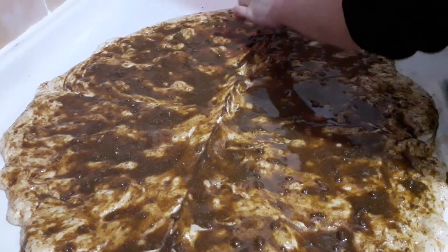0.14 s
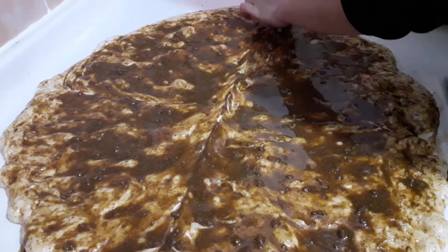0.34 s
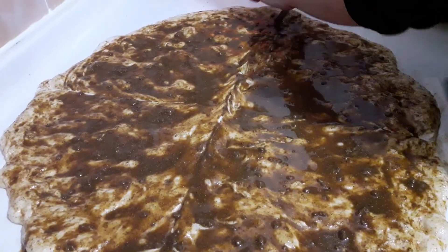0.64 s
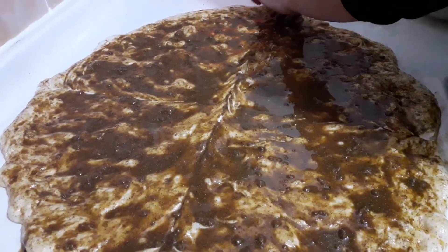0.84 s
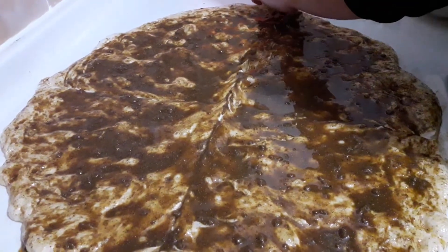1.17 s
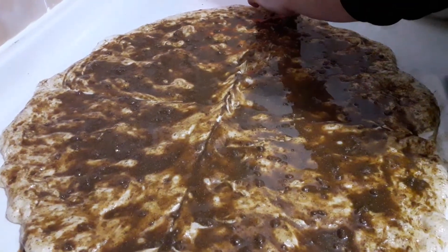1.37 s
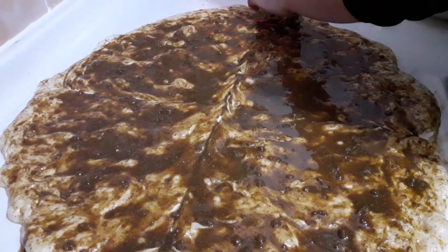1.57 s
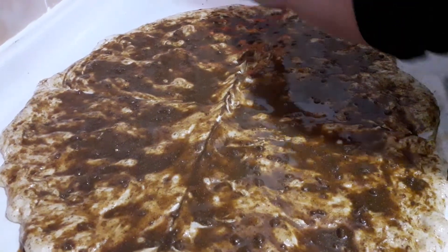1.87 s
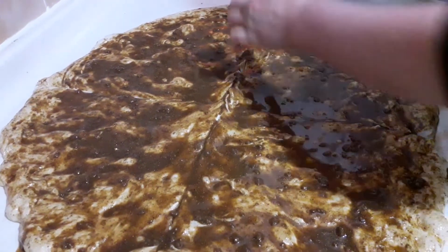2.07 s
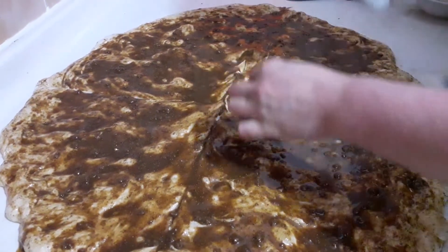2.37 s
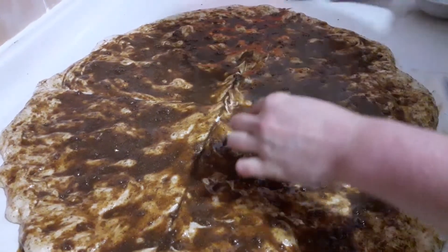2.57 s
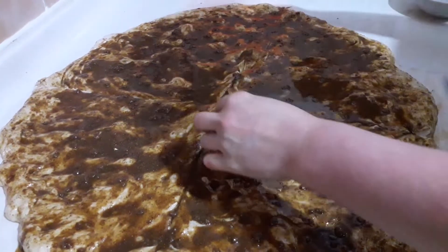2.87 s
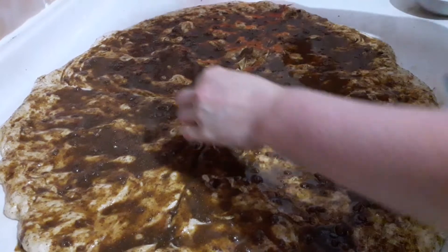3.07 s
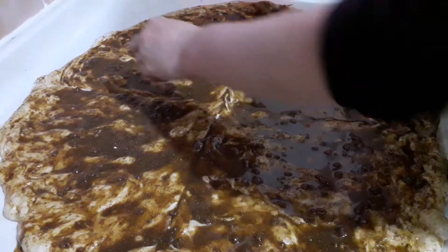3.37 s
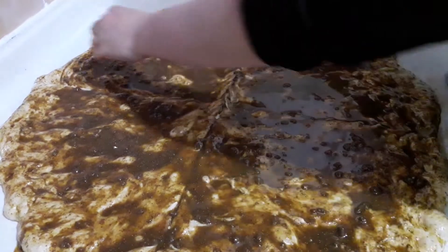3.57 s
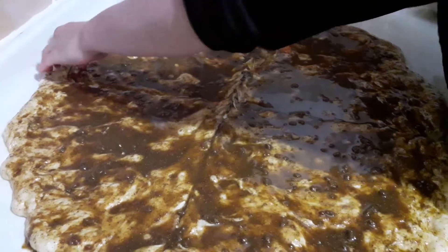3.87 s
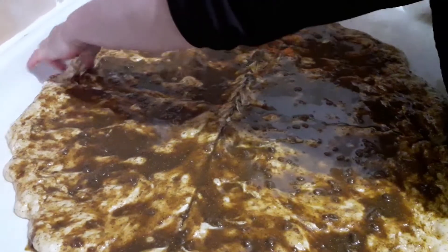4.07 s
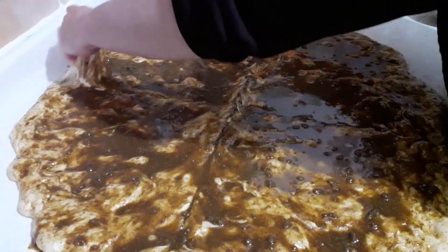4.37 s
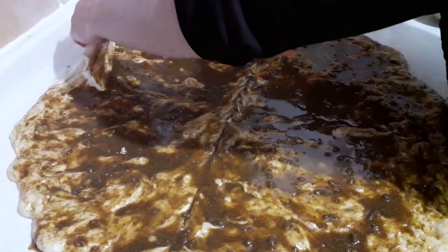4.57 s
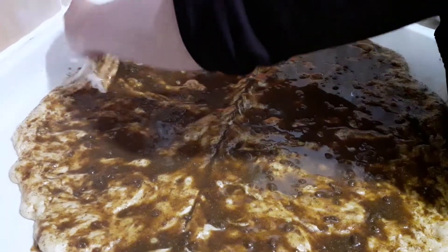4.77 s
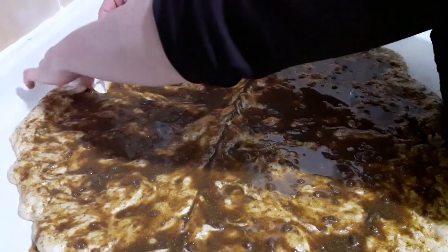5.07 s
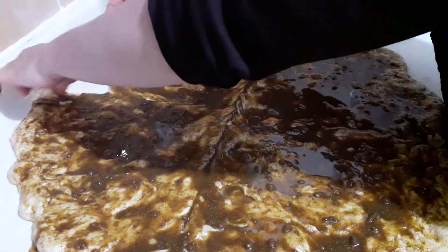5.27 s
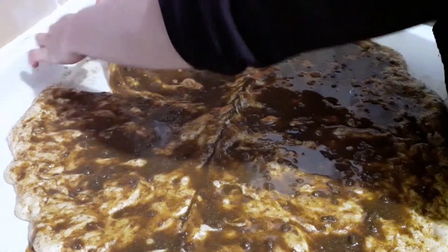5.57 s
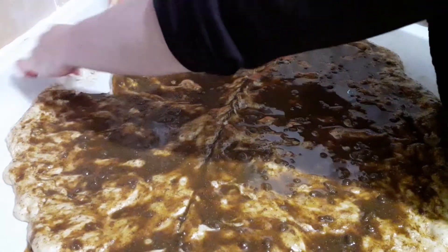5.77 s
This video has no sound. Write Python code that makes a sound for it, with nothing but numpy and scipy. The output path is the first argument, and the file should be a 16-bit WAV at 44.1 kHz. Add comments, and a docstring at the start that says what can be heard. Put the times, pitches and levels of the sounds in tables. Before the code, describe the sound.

A fridge hums low and steady in a quiet kitchen. A little way off, something hollow is pushed about in short, faint scraping strokes, then set down with a clack and a few ringing knocks. Nearer the microphone, a hand bumps the worktop, a sleeve rustles and fingers squish into oily dough. The dough is peeled up with tiny wet clicks, fine crackle and a few more soft thumps.

```python
"""A fridge hums throughout while hands work a sheet of oily dough on a kitchen worktop.
First, a little way off, something hollow is pushed about in short strokes, friction exciting its body.
After two seconds it is set down with a clack and a few knocks that also set the worktop ringing.
Then, nearer by, a hand bumps the worktop, a sleeve rustles and fingers sink into the dough.
From four seconds on the dough is peeled up amid more bumps, its oil films snapping in small wet clicks."""
import sys
import numpy as np
from scipy import signal
from scipy.fft import rfft, irfft, next_fast_len
from scipy.io import wavfile
from scipy.ndimage import uniform_filter1d

SR = 44100
rng = np.random.default_rng(int(sys.argv[2]) if len(sys.argv) > 2 else 0)


def file_out(sig):
    """Save sig as 16-bit WAV at sys.argv[1]."""
    # one column per channel
    cols = np.atleast_2d(sig).T
    # limit, then scale
    lim = np.clip(cols, -1, 1)
    pcm = np.round(lim * 32767).astype(np.int16)
    wavfile.write(sys.argv[1], SR, pcm)


N = 261954
TIME = np.arange(N) / SR
RING = TIME[:SR // 3]  # time axis of one impact or echo
HAND_LAG_S = -0.00037  # sound from the hand reaches the left side first

# spectrum of dough letting go: (f/Hz, level/dB)
PEEL_SPECTRUM = [(1500, -9), (3000, -13.5), (6000, -10.5), (8200, -1), (10000, -3.5), (12500, -5),
                 (14200, -6), (15500, 0)]


def undb(db):
    """Amplitude ratio of a level in decibels."""
    return 10 ** (np.asarray(db) / 20)


def unit(x):
    """Normalisation to rms 1."""
    return x / np.sqrt(np.mean(x ** 2))


def unit_hit(x):
    """Normalisation of a transient: its loudest 10 ms have rms 1."""
    power = np.mean(np.atleast_2d(x) ** 2, axis=0)
    return x / np.sqrt(uniform_filter1d(power, SR // 100).max())


def pan(left_db):
    """Level difference: two channel gains, the left greater by left_db."""
    return undb(np.array([[left_db], [-left_db]]) / 2)


def add(out, s, sound):
    """Superposition of a sound from time s."""
    i = max(int(s * SR), 0)
    out[:, i:i + sound.shape[-1]] += sound[..., :N - i]


def colour(x, points):
    """Minimum-phase filtering to a response given as (f/Hz, level/dB)."""
    n = 2 * next_fast_len(x.shape[-1] // 2 + SR // 20)
    hz, db = np.transpose(points)
    bin_hz = np.arange(n // 2 + 1) * SR / n
    gain = undb(np.interp(np.log(bin_hz + 1), np.log(hz), db))
    cepstrum = irfft(np.log(gain))
    cepstrum[1:n // 2] *= 2  # folding onto positive time makes the filter causal
    cepstrum[n // 2 + 1:] = 0
    return irfft(rfft(x, n) * np.exp(rfft(cepstrum)), n)[..., :x.shape[-1]]


def rolloff(x, order, hz, kind="low"):
    """Maximally flat low-pass or high-pass filtering."""
    return signal.sosfilt(signal.butter(order, hz, kind, fs=SR, output="sos"), x)


def resonance(x, hz, width):
    """Forced response of one damped resonator."""
    return signal.lfilter(*signal.iirpeak(hz, hz / width, fs=SR), x)


def band(x, hz, width):
    """Two equal resonators in cascade, for steep flanks."""
    return resonance(resonance(x, hz, width), hz, width)


def waver(rate):
    """Slow random fluctuation with a spread near 1."""
    knots = rng.standard_normal(int(N / SR * rate) + 2)
    return np.interp(TIME * rate, np.arange(len(knots)), knots)


def swell(s, hold_s, attack_s, release_s):
    """Envelope of a movement: bell-shaped rise until time s, hold, exponential decay."""
    before, after = np.minimum(TIME - s, 0), np.maximum(TIME - s - hold_s, 0)
    return np.exp(-(before / attack_s) ** 2 - after / release_s)


def grains(rate, spread_db):
    """Shot noise: random tiny impulses, a few much stronger than the rest."""
    sizes = undb(spread_db * np.minimum(rng.exponential(size=N), 4))
    return unit((rng.random(N) < rate / SR) * sizes * rng.choice([-1, 1], N))


def burst(decay_s):
    """Exponentially decaying noise of a contact."""
    return rng.standard_normal(len(RING)) * np.exp(-RING / decay_s)


def diffuse(n, split_hz=750):
    """Diffuse field: noise from all sides is coherent between the channels only in the bass."""
    mid, side = rfft(rng.standard_normal((2, n)))
    hz = np.arange(len(mid)) * SR / n
    coherence = .97 / (1 + (hz / split_hz) ** 2)
    return irfft(mid * np.sqrt(1 + coherence) + side * np.sqrt(1 - coherence) * [[1], [-1]], n)


def room(x, wet_db, lag_s=0):
    """Reverberation: direct sound (lag_s later on the left), dense reflections and a weak, dull tail."""
    early_t60_s, late_t60_s, late_db = 0.21, 0.68, -21.5
    early = diffuse(len(RING)) * undb(-60 * RING / early_t60_s)
    late = diffuse(len(RING)) * undb(late_db - 60 * RING / late_t60_s)
    response = unit(early + rolloff(late, order=1, hz=1500)) / np.sqrt(len(RING)) * undb(wet_db)
    lag = round(lag_s * SR)
    response[[0, 1], [max(lag, 0), max(-lag, 0)]] += 1  # the direct path
    heard = signal.fftconvolve(np.atleast_2d(x), response, axes=1)[:, :x.shape[-1]]
    return heard / np.hypot(1, undb(wet_db))


def fridge():
    """Line spectrum over noise: wavering compressor tones, hiss, a thin whine and the room's still air."""
    # spectrum of the room's air: (f/Hz, level/dB)
    air_spectrum = [(25, -26.5), (55, -4), (80, -13.5), (125, -2), (160, 1.5), (210, -22), (290, -21),
                    (430, -16), (700, -24), (1400, -27.5), (3000, -30.5), (6500, -36.5), (10000, -34.5),
                    (16000, -40.5)]
    # compressor tones: (f/Hz, level/dB)
    tones = [(53.8, -73.5), (96.9, -65.5), (145.3, -63.5), (279.9, -72.5), (393.0, -74), (489.9, -82),
             (694.4, -79), (1184, -80)]
    # bands of hiss: (f/Hz, width/Hz, level/dB, left minus right/dB)
    hiss_bands = [(276, 88, -71, -9.5), (8300, 730, -82.5, 12)]
    hum_waver_db = 2.3 * waver(2.8)
    out = unit(colour(diffuse(N), air_spectrum)) * undb(-64 + .5 * waver(4.5))
    for hz, db in tones:
        # the shorter the wave, the more its phase differs between the channels
        phase = 2 * np.pi * hz * TIME + 0.69 * waver(8.8) + np.array([[0], [min(hz / 600, 2)]])
        out += np.sqrt(2) * np.sin(phase) * undb(db + hum_waver_db + 0.54 * waver(6.4)) * pan(0.68)
    flow = diffuse(N)
    for hz, width, db, left_db in hiss_bands:
        out += unit(band(flow, hz, width)) * undb(db + 0.59 * waver(17)) * pan(left_db)
    whine = unit(band(flow, hz=4350, width=200)) * undb(-83.5 + 1.5 * waver(11))
    return out + whine * pan(1.4)


def sliding():
    """Stick-slip friction: dense slips excite the hollow body as each stroke speeds up and dies away."""
    # response of the body to slips: (f/Hz, level/dB)
    slip_spectrum = [(210, -40), (350, -17), (707, 2.5), (850, -7.5), (1020, -14.5), (1240, -5), (1430, -8),
                     (1490, -7.5), (1750, -6.5), (1900, -6), (2210, -5), (2740, -14.5), (4000, -23),
                     (5200, -63), (8800, -120)]
    # pushes: (fastest at t/s, length/s, lower body/dB, upper body/dB, grit/dB, favoured resonance f/Hz)
    strokes = [(0.117, 0.091, -58, -50, -67, 1660), (0.266, 0.092, -53.5, -57.5, -67.5, 1630),
               (.53, 0.1, -53.5, -51.5, -66.5, 1510), (0.894, 0.098, -51, -55, -60.5, 1250),
               (0.963, .07, -63.5, -55.5, -68, 1630), (1.085, 0.1, -62.5, -54, -65, 1510),
               (1.185, 0.029, -83, -51, -64.5, 1760), (1.248, .085, -48.5, -47.5, -54.5, 1540),
               (1.383, 0.088, -53.5, -52.5, -66, 1500), (1.549, .08, -55.5, -53.5, -68.5, 1440)]
    # gritty hiss: (f/Hz, level/dB)
    grit_spectrum = [(1500, -7), (3000, 7), (4200, -2), (8000, 4.5), (11000, -3), (15000, -3)]
    lead_s = 0.0098  # the upper body speaks first, before the full weight bears down
    slips = unit(colour(grains(rate=3100, spread_db=2), slip_spectrum))
    low, high = (unit(rolloff(slips, order=4, hz=1000, kind=kind)) for kind in ("low", "high"))
    grit = unit(colour(grains(rate=1100, spread_db=4.5), grit_spectrum))
    out = np.zeros(N)
    for s, length_s, low_db, high_db, grit_db, ring_hz in strokes:
        push, lead = (swell(at, 0, 0.44 * length_s, 0.35 * length_s) for at in (s, s - lead_s))
        upper = unit(unit(band(high, ring_hz, width=800)) + undb(-3) * high)
        out += push * (low * undb(low_db) + grit * undb(grit_db)) + lead * upper * undb(high_db)
    return room(out, wet_db=5.5, lag_s=-0.0004) * pan(3.7)


def crack(db):
    """A brief contact has a broad spectrum: a bright crack, heard mostly by reflection from the walls."""
    # spectrum of the hard contact: (f/Hz, level/dB)
    crack_spectrum = [(900, -16), (1400, -32), (1750, 3), (2100, -19), (2720, 0.5), (3350, -11),
                      (4500, 1.5), (7000, -4), (8000, 2.5), (9500, -8.5), (12500, -8.5), (15500, -10.5)]
    contact = colour(burst(decay_s=0.0018), crack_spectrum)
    return unit_hit(room(contact, wet_db=12.5)) * undb(db) * pan(3.7)


def ticks():
    """Lone hard ticks: impulsive cracks with their highest treble attenuated."""
    # ticks: (t/s, level/dB)
    contacts = [(.539, -54), (5.668, -63)]
    out = np.zeros((2, N))
    for s, db in contacts:
        add(out, s, rolloff(crack(db), order=2, hz=9000))
    return out


def thump(db, ring_hz, pat_db, lag_s):
    """Modal excitation: a blow rings the worktop modes that its place favours, under a dull pat."""
    # worktop modes: (f/Hz, T60/s, level/dB)
    modes = [(77.9, 0.63, -1.5), (103.6, 0.51, 0), (131, 0.36, -0.5), (150.5, 0.51, -0.5), (167, 0.18, 2.5),
             (242.2, 0.36, -7), (278, 0.43, -7), (380, 0.057, -6), (425, 0.089, -9)]
    # spectrum of the soft contact: (f/Hz, level/dB)
    pat_spectrum = [(30, -39), (80, -10), (200, 4.5), (350, 7), (450, -3), (740, -0.5), (1050, -14.5),
                    (1350, -10), (1700, -23.5), (2100, -18.5), (5000, -32.5), (12000, -40)]
    ring = 0
    for hz, t60, mode_db in modes:
        place_db = -8 * abs(np.log2(hz / ring_hz))
        phase = 2 * np.pi * hz * RING + 2.01 * rng.standard_normal()
        ring += undb(mode_db + place_db - 60 * RING / t60) * np.sin(phase)
    ring *= 1 - np.exp(-RING / 0.0024)  # the top is loaded gradually
    ring = rolloff(ring, order=3, hz=64.3, kind="high")  # it radiates little deep bass
    pat = room(colour(burst(decay_s=0.0066), pat_spectrum), wet_db=18, lag_s=lag_s)
    ring = room(ring, wet_db=-18, lag_s=lag_s)
    return unit_hit(ring) * undb(db) * pan(0.83) + unit_hit(pat) * undb(pat_db) * pan(1.2)


def knocks():
    """Free vibration of the hollow thing set down: a softer contact leaves its upper modes quiet."""
    # modes of the hollow body: (f/Hz, width/Hz, level/dB)
    modes = [(353, 25, -12), (480, 26, -6.5), (610, 77, -12), (700, 61, 1.5), (838, 47, 1),
             (1080, 27.6, -2.5), (1138, 67, -1.5), (1235, 58, -3.5), (1470, 62, -10), (1597, 52, -8),
             (1817, 77, 0), (1970, 68, -0.5), (2280, 79, -9), (2690, 92, -11), (3060, 100, -15)]
    # impacts: (t/s, ring level/dB, contact bandwidth/Hz, scrape/dB, crack/dB, thump/dB, pat/dB)
    impacts = [(2.171, -45.5, 2500, -50.5, -39, -38.5, -42.5), (2.27, -57, 2500, -59, -53.5, -44.5, -45.5),
               (2.304, -53, 5000, -49.5, -62.5, -57, -69), (2.383, -32, 2980, -34.5, -66, -39, -66),
               (2.404, -40, 2950, -34.5, -63.5, -41.5, -46), (2.529, -40.5, 2190, -60, -91, -58, -60),
               (2.541, -32, 2250, -42.5, -86, -42.5, -49)]
    # spectrum of the scrape at contact: (f/Hz, level/dB)
    scrape_spectrum = [(250, -10.5), (700, -2), (1300, -7), (2000, -9.5), (2450, -22), (3200, -26),
                       (4500, -35.5), (8000, -60)]
    lag_s = 0.00029
    impulse = signal.unit_impulse(len(RING))
    # neighbouring modes swing opposite ways, and the higher ones radiate more to the left
    ring = sum((-1) ** k * undb(db) / width * resonance(impulse, hz, width) * pan(4 * np.log2(hz / 900))
               for k, (hz, width, db) in enumerate(modes))
    out = np.zeros((2, N))
    for s, db, contact_hz, scrape_db, crack_db, thump_db, pat_db in impacts:
        blow = rolloff(ring, order=3, hz=contact_hz)
        scrape = colour(burst(decay_s=0.011), scrape_spectrum)
        add(out, s, unit_hit(room(blow, wet_db=5.5, lag_s=lag_s)) * undb(db))
        add(out, s, unit_hit(room(scrape, wet_db=9)) * undb(scrape_db) * pan(2.8))
        add(out, s, crack(crack_db) + thump(thump_db, ring_hz=115, pat_db=pat_db, lag_s=lag_s))
    return out


def bumps():
    """Soft impacts of the hand excite the low modes of the worktop."""
    # bumps: (t/s, ring level/dB, favoured f/Hz, pat level/dB)
    impacts = [(2.64, -49, 111, -58), (2.867, -49.5, 108, -70), (3.804, -41.5, 130, -58.5),
               (3.962, -47, 146, -54.5), (3.987, -43.5, 127, -47.5), (4.025, -46.5, 66, -78),
               (4.994, -45, 145, -55.5), (5.667, -42.5, 166, -48.5), (5.685, -38, 160, -50)]
    out = np.zeros((2, N))
    for s, db, ring_hz, pat_db in impacts:
        add(out, s, thump(db, ring_hz, pat_db, HAND_LAG_S))
    return out


def sleeve():
    """Friction noise: cloth fibres brush past each other in a thin hiss while the arm reaches."""
    # spectrum of rubbing cloth: (f/Hz, level/dB)
    cloth_spectrum = [(2000, -14), (5000, -22), (7500, -1), (9500, 0), (12000, -11), (15500, -9)]
    reach = swell(3.61, hold_s=0.33, attack_s=0.27, release_s=0.11)
    return unit(colour(diffuse(N), cloth_spectrum)) * reach * undb(-73 + 0.86 * waver(9.8)) * pan(0.33)


def squish():
    """Shot noise of fingers sinking into the dough: dense tiny impulses merge into a squish."""
    # presses: (t/s, hold/s, level/dB)
    presses = [(3.9, 0.075, -61.5), (4.993, 0.034, -70.5)]
    # spectrum of yielding dough: (f/Hz, level/dB)
    squish_spectrum = [(300, -11), (600, 13.5), (1000, 3), (2200, 1.5), (3500, -8), (4800, -4.5),
                       (9000, -6), (15000, -18)]
    pressing = sum(undb(db) * swell(s, hold_s, attack_s=0.015, release_s=0.14)
                   for s, hold_s, db in presses)
    return unit(colour(grains(rate=2800, spread_db=4), squish_spectrum)) * pressing


def squelches():
    """Air pockets squeezed out of the fold: noise bursts through a broad resonance."""
    # air pockets: (t/s, level/dB, f/Hz)
    pockets = [(3.977, -58.5, 4400), (4.022, -58.5, 2220), (4.082, -53.5, 3020), (4.103, -57.5, 3370),
               (4.153, -58.5, 1600), (4.195, -67, 1550)]
    out = np.zeros((2, N))
    for s, db, hz in pockets:
        add(out, s, unit_hit(band(burst(decay_s=0.021), hz, width=0.59 * hz)) * undb(db))
    return out


def wet_clicks():
    """Rupture of oil films: each snaps with a tiny, heavily damped ring."""
    # snapping films: (t/s, ring level/dB, f/Hz)
    films = [(4, -51.5, 8300), (4.03, -55.5, 8200), (4.0675, -48, 6660), (4.0808, -50.5, 8360),
             (4.1261, -51, 8560), (4.161, -57.5, 7600), (4.218, -52.5, 7950), (4.335, -63, 8150),
             (4.5292, -54.5, 8400), (4.642, -58, 8160), (4.6987, -54.5, 8320), (5.069, -61.5, 8900),
             (5.1858, -57, 8400), (5.217, -56.5, 8300), (5.839, -59.5, 8230), (5.9132, -60, 8000)]
    out = np.zeros((2, N))
    for s, db, hz in films:
        pop = burst(decay_s=0.00047)
        snap = unit_hit(band(pop, hz, width=1800)) + undb(1.5) * unit_hit(colour(pop, PEEL_SPECTRUM))
        add(out, s, snap * undb(db))
    return out


def peeling():
    """Adhesion gives way in tiny steps: fine crackle follows each pull on the dough."""
    # pulls: (t/s, hold/s, level/dB)
    pulls = [(4, 0.18, -62), (4.335, 0.014, -62), (4.424, 0.094, -65.5), (4.657, 0.18, -68.5),
             (5.067, 0.014, -62.5), (5.163, 0.051, -60.5), (5.842, 0.043, -64)]
    envelope = undb(-78.5) * (TIME > pulls[0][0])  # once lifted, the dough keeps crackling faintly
    for s, hold_s, db in pulls:
        envelope = np.maximum(envelope, undb(db) * swell(s, hold_s, attack_s=0.015, release_s=0.076))
    crackle = np.array([grains(rate=330, spread_db=5) for _ in range(2)])
    return unit(colour(crackle, PEEL_SPECTRUM)) * envelope


def scene():
    """Superposition of all sources; the sounds of the dough share one place in the kitchen."""
    out = fridge() + sliding() + ticks() + knocks() + bumps() + sleeve()
    dough = squish() + squelches() + wet_clicks() + peeling()
    return out + room(dough, wet_db=-1, lag_s=HAND_LAG_S) * pan(5.2)


def record(dry):
    """Frequency response: the two microphones differ a little in colour, and the top is cut steeply."""
    # difference in sensitivity: (f/Hz, right minus left/dB)
    balance = [(100, -1.5), (350, 0), (1200, 2), (2500, -0.1), (8500, 0), (12000, 6.5), (16000, 2.5)]
    top_hz = 15850
    heard = np.array([colour(channel, [(hz, side * db / 2) for hz, db in balance])
                      for channel, side in zip(dry, (-1, 1))])
    return signal.sosfilt(signal.ellip(10, .2, 70, top_hz, fs=SR, output="sos"), heard)


dry = scene()
out = record(dry)
file_out(out)
```